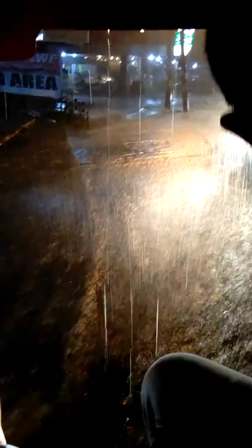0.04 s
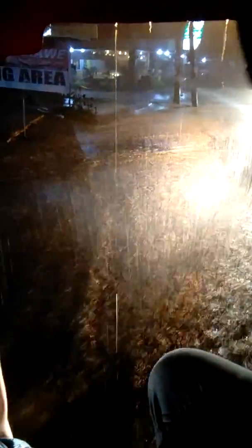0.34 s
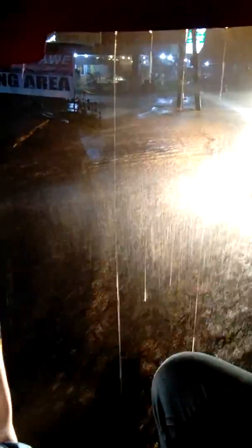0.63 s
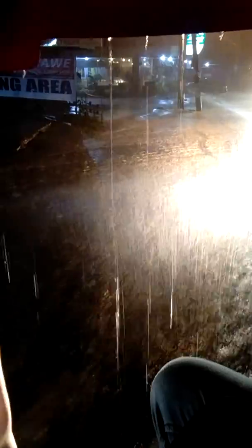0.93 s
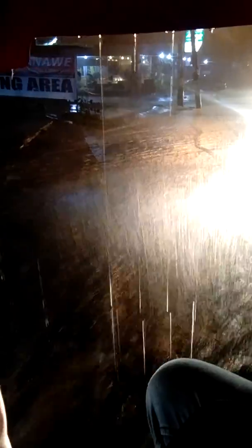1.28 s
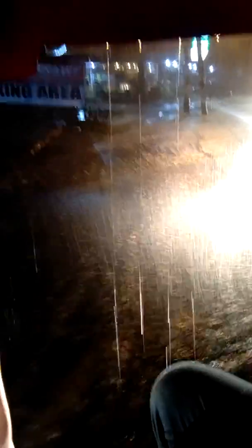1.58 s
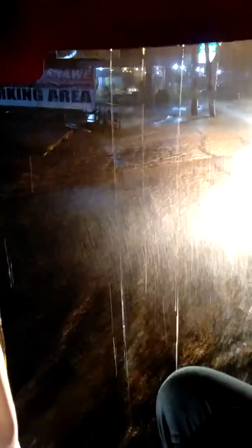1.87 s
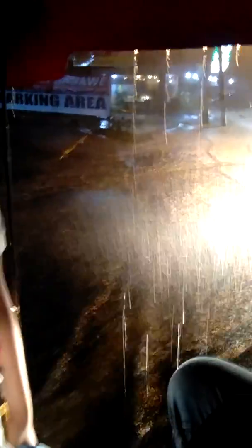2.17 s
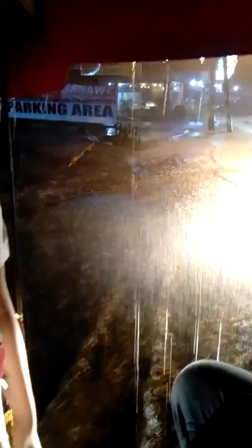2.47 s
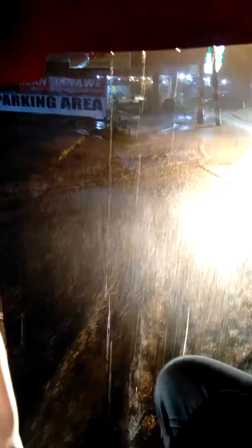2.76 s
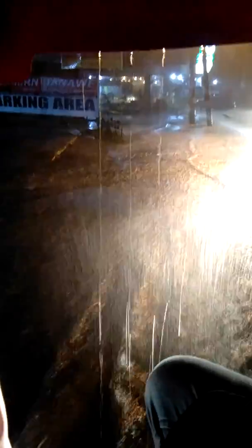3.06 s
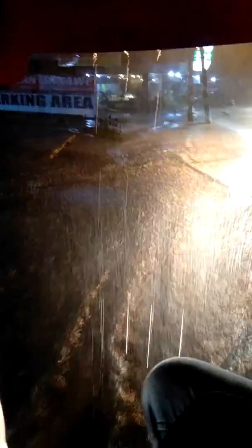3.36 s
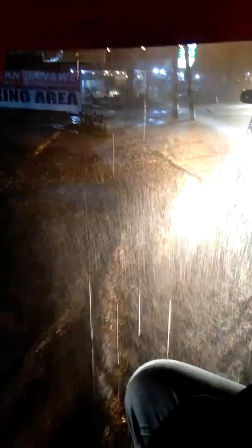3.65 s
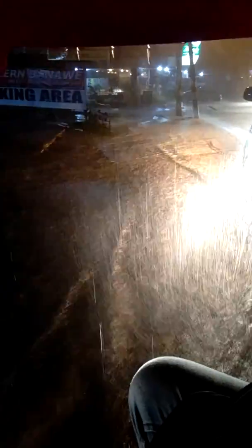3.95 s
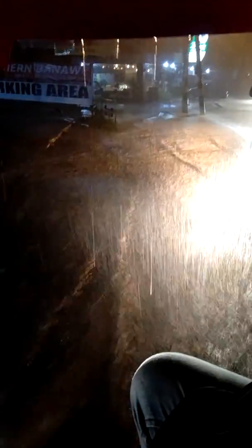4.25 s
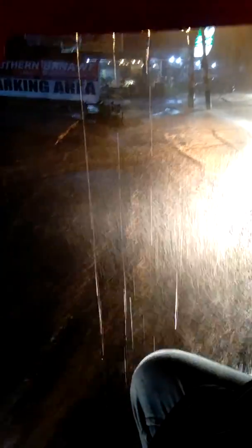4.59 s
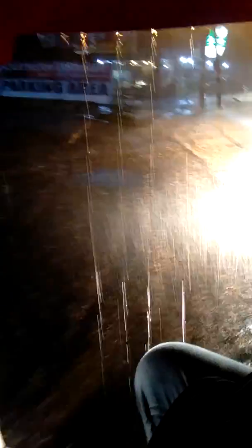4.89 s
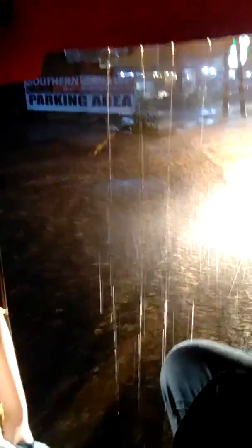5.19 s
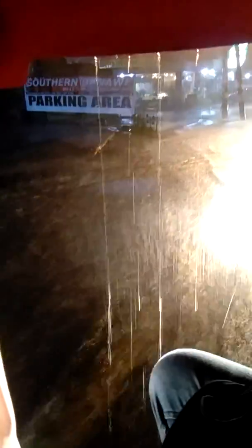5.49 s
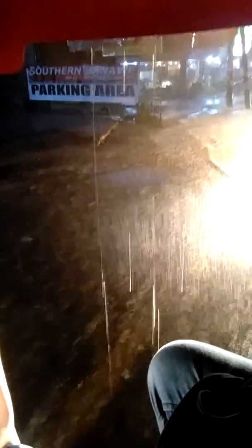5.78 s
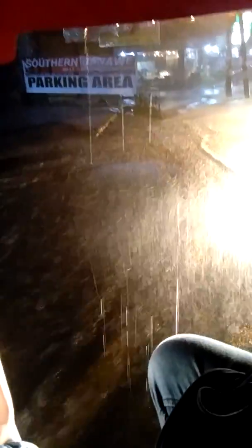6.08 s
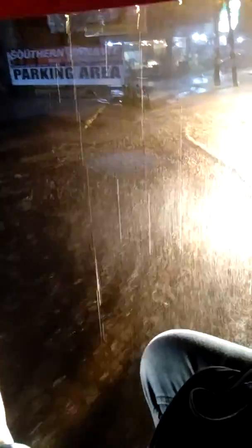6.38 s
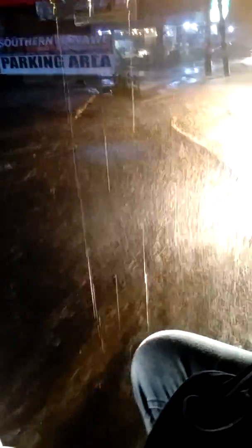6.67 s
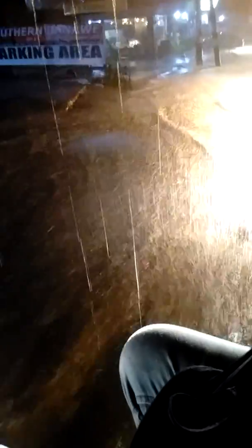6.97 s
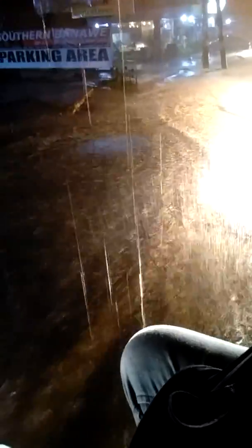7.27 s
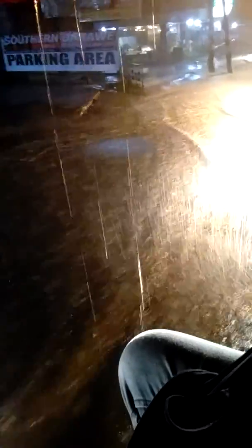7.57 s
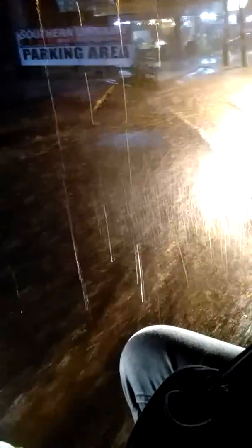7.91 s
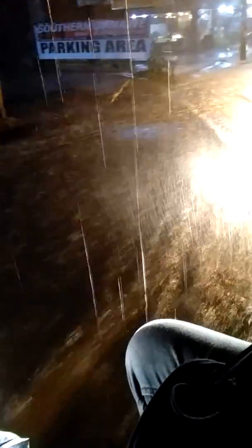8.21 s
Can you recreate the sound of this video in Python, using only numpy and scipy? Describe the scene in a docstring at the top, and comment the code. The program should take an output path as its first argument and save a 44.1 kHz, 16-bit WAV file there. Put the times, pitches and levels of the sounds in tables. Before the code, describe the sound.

From the passenger seat of an open-sided motor tricycle, a small engine drones in repeated bursts of throttle, chugging in between and pulsing against two other engines. The cab booms and rattles, while heavy rain and tyre spray hiss throughout and single drops tick close by. A thin, trembling drive squeal sounds over the first two seconds, again from about 3.5 to 5 seconds, and from 6.7 seconds on. A wheel throws up a puddle around 3.6 seconds, with smaller splashes near 4.2 and 6.8. Between 4.9 and 7 seconds a loose panel clacks about seven times. From about 5.3 seconds the engine alongside speeds up and rasps, and loose metal chatters with it, easing after 7 seconds. From roughly 7.2 to 8 seconds water faintly tinkles on a metal bar. Engines and rain continue to the end, just past 8 seconds.

```python
"""A ride in an open-sided motor tricycle along a flooded street in heavy rain at night.
From the start its small engine drones in bursts and beats against two others in the traffic, while the
drive squeals, the cab booms, rain and tyre spray hiss and drops tick close by. Near the middle a wheel
throws up a puddle. Then a loose panel knocks, and metal chatters as the engine alongside speeds up.
Near the end, water dribbles on a metal bar. All along, a limiter turns the loudest moments down."""
import sys
import numpy as np
from scipy import signal
from scipy.fft import rfft, irfft, next_fast_len
from scipy.io import wavfile
from scipy.ndimage import uniform_filter1d, minimum_filter1d, map_coordinates

SR = 44100
rng = np.random.default_rng(int(sys.argv[2]) if len(sys.argv) > 2 else 0)


def log_audio(samples):
    """Write samples as a 16-bit WAV file to the path given in sys.argv[1]."""
    # one column per channel
    frames = np.atleast_2d(samples).T
    # limit to full scale, then quantise
    limited = np.clip(frames, -1, 1)
    pcm = np.round(limited * 32767).astype(np.int16)
    wavfile.write(sys.argv[1], SR, pcm)


N = 367794

# The notes at which the cab booms. Each row: pitch in Hz, width in Hz, level in dB.
CAB_RINGS = [(48.7, 11, -16), (94.2, 25.4, 1), (133.6, 28, 1), (261.5, 22.2, -11.5), (309.2, 27, -14),
             (466, 94, -30.5)]
# The engine alongside. Each row: time in seconds, firings per second, drone level in dB.
NEIGHBOUR_ENGINE = [(0, 20.2, -21.5), (.2, 21.1, -17.5), (.38, 21.1, -7.5), (.6, 22.3, -20), (1, 23.2, -21),
                    (1.35, 22.2, -20), (1.56, 21.5, -10.5), (1.68, 27.6, -12.5), (2, 26, -14.5),
                    (2.2, 27.9, -15), (2.42, 28.5, -16.5), (2.6, 27.8, -16.5), (2.76, 26.5, -24),
                    (3.05, 25.3, -17.5), (3.3, 23.6, -18.5), (3.5, 19.8, -13.5), (3.7, 20.2, -13.5),
                    (3.9, 22.5, -14), (4.1, 22.2, -12.5), (4.24, 21.4, -11), (4.33, 23.6, -13),
                    (4.6, 24.8, -17.5), (5.05, 24.7, -14), (5.33, 26.6, -15.5), (5.5, 28.7, -15.5),
                    (5.6, 32, -14.5), (5.85, 28.2, -17), (6, 28.6, -13), (6.11, 29, -14.5),
                    (6.26, 29.3, -15), (6.42, 29.5, -16), (6.81, 32, -16), (6.96, 32.5, -15.5),
                    (7.14, 29.6, -17), (7.32, 27, -12.5), (7.5, 25, -17), (7.73, 27.4, -13),
                    (7.9, 29, -16.5), (8.11, 29, -13.5), (8.34, 28.5, -16.5)]
# How strong the watery hiss is. Each row: time in seconds, level in dB.
WETNESS = [(0, -39.5), (.25, -41.5), (1, -38.5), (1.25, -39.5), (1.8, -39.5), (2, -42.5), (2.9, -43),
           (3.45, -41), (3.65, -39.5), (3.8, -41), (4.65, -41), (5.2, -44.5), (5.8, -43), (6.35, -44),
           (6.8, -41.5), (7, -43), (7.45, -41), (7.75, -40.5), (8.34, -40.5)]
# The tone of tyre spray, also used for a panel's rattle. Each row: frequency in Hz, level in dB.
WASH_COLOUR = [(250, -7), (480, -1.5), (700, 2), (820, 2.5), (950, 3.5), (1180, 0.5), (1400, 0), (2000, -2),
               (2900, -7.5), (4000, -17), (5200, -37), (8000, -43)]
# The tone of drops splashing nearby. Each row: frequency in Hz, level in dB.
SPATTER_COLOUR = [(2000, -16), (4400, 3), (7000, -4.5), (8800, 3), (9700, 6.5), (11000, -9), (12500, -18),
                  (15400, -26)]


def amp(db):
    """Turn decibels into a number to multiply by."""
    return 10 ** (np.asarray(db) / 20)


def unit(x):
    """Scale a signal so that its average strength (rms) is 1."""
    return x / np.sqrt(np.mean(x ** 2) + 1e-20)


def curves(rows):
    """Join a table's points with lines: one curve for each column after the time."""
    times, *columns = np.transpose(rows)
    return [np.interp(np.arange(N) / SR, times, column) for column in columns]


def wobble(per_second):
    """A smooth curve through this many random points a second."""
    points = rng.standard_normal(int(N * per_second / SR) + 4)
    coarse = np.arange(0, N + 16, 16)
    return np.interp(np.arange(N), coarse, map_coordinates(points, [coarse * per_second / SR]))


def filtered(x, response):
    """Multiply each frequency in x by response(hz)."""
    size = next_fast_len(N + SR // 2)
    return irfft(rfft(x, size) * response(np.fft.rfftfreq(size, 1 / SR)), size)[:N]


def coloured(x, colour):
    """Give x the tone set by rows of frequency and level, at strength 1."""
    freqs, db = np.transpose(colour)
    return unit(filtered(x, lambda hz: amp(np.interp(np.log(hz + 1), np.log(freqs), db, right=-120))))


def resonate(x, rings):
    """Pass x through a body that rings at certain pitches."""
    return filtered(x, lambda f: sum((-1) ** k * amp(db) * 1j * f * width / (hz**2 - f**2 + 1j * f * width)
                                     for k, (hz, width, db) in enumerate(rings)))


def noise():
    """Fresh white noise."""
    return rng.standard_normal(N)


def cycles(hz):
    """Count the cycles completed at a changing rate."""
    return np.cumsum(hz) / SR


def throttle(idle_rate=22, ramp_s=0.12, thump_muting=0.85):
    """Each burst of throttle lifts the firings per second, brings in the drone and softens the thumps."""
    # Each row: start, peak and end in seconds, top firings per second, drone and undertone in dB.
    bursts = [(-.4, 0, .3, 24.4, -15, -32), (0.42, 0.992, 1.52, 25.8, -13, -23),
              (1.498, 2.022, 2.17, 25.2, -15.5, -29), (2.502, 2.75, 3.04, 25.1, -15, -38),
              (3.281, 3.721, 3.88, 24.7, -17, -31), (4.203, 4.621, 4.88, 24.4, -14.5, -26),
              (6.559, 6.802, 7.15, 24.4, -13.5, -34), (7.05, 7.82, 7.85, 26.3, -14, -23),
              (8.051, 8.45, 8.7, 24.3, -15, -37)]
    t = np.arange(N) / SR
    rate, drone_gain, undertone_gain, load = idle_rate, 0, 0, 0
    for start, peak, end, top_rate, drone_db, undertone_db in bursts:
        arch = np.sin(np.pi / 2 * np.interp(t, [start, peak, end], [0, 1, 0])) ** 1.4
        pull = np.clip(np.minimum(t - start, end - t) / ramp_s, 0, 1)
        rate = rate + (top_rate - idle_rate) * arch
        drone_gain = np.maximum(drone_gain, amp(drone_db) * pull)
        undertone_gain = undertone_gain + amp(undertone_db) * arch
        load = np.maximum(load, pull)
    return rate, drone_gain, undertone_gain, 1 - thump_muting * load


def exhaust(rate, harmonics, smear, uneven_db=0.7, flutter_db=0.5):
    """Tones at multiples of the firing rate add up to uneven thumps; smear puts them a bit out of step."""
    turns = cycles(rate)
    sizes_db = uneven_db * rng.standard_normal(400)
    tones = 0
    for multiple, db in harmonics:
        gain = amp(db + flutter_db * wobble(14))
        tones += gain * np.cos(2 * np.pi * multiple * turns + smear * rng.standard_normal())
    return -amp(np.interp(turns, np.arange(len(sizes_db)), sizes_db)) * tones


def firings(rate, scatter_db):
    """One push per firing, each of its own size."""
    fired = np.diff(np.floor(cycles(rate) + rng.random()), prepend=0) > 0
    return fired * amp(scatter_db * noise())


def tricycle(rate, drone_gain, undertone_gain, thump_gain):
    """When pulling, the engine drones over a deep undertone; when coasting, it chugs in separate thumps."""
    # The tones of the drone and the undertone. Each row: multiple of the firing rate, level in dB.
    drone_tones = [(4, 3.5), (5, -6), (6, -14), (7, -18), (8, -20)]
    deep_tones = [(2, -2.7), (3, 1)]
    drone = drone_gain * exhaust(rate, drone_tones, smear=0.48)
    undertone = undertone_gain * exhaust(rate, deep_tones, smear=0.28)
    pushes = firings(rate * (1 + 0.03 * wobble(6)), scatter_db=2.2)
    thumps = unit(resonate(thump_gain * pushes, CAB_RINGS))
    return drone + undertone + amp(-22.5) * thumps


def traffic():
    """Two more engines drone; the nearer one rasps as its higher tones sweep through the cab's notes."""
    # The engine farther off. Each row: time in seconds, firings per second, level in dB.
    far_engine = [(0, 23.2, -26), (.65, 22.2, -22), (.9, 18.6, -42), (1.4, 20.2, -24), (1.74, 22.8, -20.5),
                  (2.15, 22.5, -23), (2.75, 22.3, -24), (3.15, 21.1, -32), (3.65, 20.5, -21),
                  (4.3, 20.9, -25), (4.9, 20.8, -30), (5.5, 21.7, -24), (6.5, 20.8, -26), (8.34, 21.2, -29)]
    # The near engine's rasp, strongest as it speeds up. Each row: time in seconds, level in dB.
    rasp_levels = [(0, -29), (1.5, -31), (2, -33.5), (2.45, -29), (2.8, -38), (3.2, -36), (3.6, -36.5),
                   (4.4, -31), (5, -39), (5.4, -26), (5.9, -26.5), (6.3, -26), (6.7, -21), (7, -25),
                   (7.3, -29.5), (8.34, -30.5)]
    # The tones of the exhausts. Each row: multiple of the firing rate, level in dB.
    near_tones = [(3, -21), (4, -3), (5, 3.3), (6, -9.5), (7, -22)]
    far_tones = [(6, 1.5), (7, -5), (8, 0.5), (12, -15.5), (14, -14.5), (15, -15.5)]
    rasp_tones = [(8, -7), (9, 1.5), (10, -3.5), (11, -2.5), (12, -10), (15, -0.5), (16, 4.5), (17, -1.5)]
    # How well the near drone carries into the cab. Each row: frequency in Hz, gain in dB.
    carry = [(60, -17), (85, -7.5), (105, -0.5), (130, 0), (165, -2.5), (200, 1.5)]
    near_rate, near_db = curves(NEIGHBOUR_ENGINE)
    far_rate, far_db = curves(far_engine)
    rasp_db, = curves(rasp_levels)
    near = amp(near_db) * exhaust(near_rate, near_tones, smear=0.28)
    near = filtered(near, lambda hz: amp(np.interp(hz, *np.transpose(carry))))
    far = amp(far_db) * exhaust(far_rate, far_tones, smear=0.4)
    rasp_gain = amp(rasp_db + 1.42 * wobble(45))
    rasp = exhaust(near_rate * (1 + 0.02 * wobble(22)), rasp_tones, smear=0.36, uneven_db=1.0)
    return near + far + rasp_gain * unit(resonate(rasp, CAB_RINGS))


def strand(hz, wander_hz=14, flutter_db=2.5):
    """One unbroken squealing tone whose pitch and level tremble."""
    gain = amp(flutter_db * wobble(60))
    return unit(gain * np.cos(2 * np.pi * cycles(hz + wander_hz * wobble(90))))


def whine(hz, width_hz):
    """A fuzzy tone: a narrow band of noise around one pitch."""
    angle = 2 * np.pi * cycles(hz)
    return unit(wobble(width_hz) * np.cos(angle) + wobble(width_hz) * np.sin(angle))


def ringing(rings):
    """Metal that keeps ringing at several fuzzy pitches."""
    return sum(amp(db) * whine(np.full(N, hz), width) for hz, width, db in rings)


def jolts(rate, decay):
    """A repeating shake that fades until the next one comes."""
    return unit(np.exp(-decay * (cycles(rate) % 1)))


def drive_squeal(rate):
    """The drive squeals under load, shaken by each firing, and nearby metal rings along."""
    # The squeal's path. Each row: time in seconds, centre pitch in Hz, level in dB.
    squeal_path = [(0, 1973, -36), (.28, 1733, -38), (.38, 1722, -49), (.52, 1810, -34), (.8, 1944, -36),
                   (1, 1990, -40), (1.25, 1923, -35), (1.47, 1840, -40), (1.85, 1867, -40), (2, 1713, -60),
                   (3.4, 1730, -62), (3.57, 1818, -37), (3.72, 2002, -39), (3.84, 1875, -39.5),
                   (3.98, 1798, -42), (4.3, 1873, -37), (4.6, 1918, -37), (4.8, 1877, -36),
                   (4.88, 1671, -38), (4.96, 1624, -63), (6.6, 1700, -64), (6.73, 1867, -38),
                   (7.1, 1787, -39), (7.35, 1871, -42), (7.7, 1856, -45), (7.95, 1896, -40),
                   (8.17, 1813, -40), (8.34, 1945, -35)]
    # A higher tone above it. Each row: time in seconds, level against the squeal in dB.
    overtone_levels = [(0, -6), (1.1, -12), (1.7, -10), (4.5, -19), (6.8, -8), (8.34, -8)]
    # The nearby metal. Each row: pitch in Hz, width in Hz, level in dB.
    metal_rings = [(1274, 110, -7.5), (3043, 160, -12.5)]
    hz, squeal_db = curves(squeal_path)
    overtone_db, = curves(overtone_levels)
    strands = unit(strand(hz - 2 * rate)
                   + amp(0.5) * strand(hz + 2 * rate)
                   + amp(-10) * strand(hz - 12 * rate))
    overtone = amp(overtone_db) * whine(1.53 * hz, width_hz=130)
    return amp(squeal_db) * jolts(rate, decay=1.0) * (strands + overtone + ringing(metal_rings))


def patter(per_second, scatter_db):
    """Tiny hits at random moments, most small, a few large."""
    hits = rng.random(N) < per_second / SR
    return unit(hits * amp(scatter_db * np.clip(noise(), -3, 2.5)) * np.sign(noise()))


def road(rate):
    """The wet road shakes the cab, the bodywork rattles with the engine and the tyres throw water."""
    # How rough the ride is. Each row: time in seconds, rumble in dB, rattle in dB.
    roughness = [(0, -15, -28), (.4, -23, -29.5), (1, -19.5, -27), (1.7, -15.5, -28.5), (2.4, -22.5, -26.5),
                 (2.8, -22, -29.5), (3.2, -18.5, -28.5), (3.7, -17.5, -27), (4.2, -23, -29.5),
                 (5.3, -22, -30.5), (6, -23.5, -30), (6.8, -18.5, -29), (7.2, -20.5, -30), (7.65, -15, -30),
                 (8.34, -21, -27.5)]
    # The tone of the rumble and of the rattle. Each row: frequency in Hz, level in dB.
    rumble_colour = [(15, -34), (35, -17), (55, -15.5), (75, -5.5), (100, -5.5), (125, -2), (190, -13),
                     (260, -21.5), (500, -66)]
    rattle_colour = [(120, -34), (200, -8), (310, 1.5), (400, -7.5), (530, -7), (700, -18.5), (1500, -54)]
    rumble_db, rattle_db = curves(roughness)
    wet_db, = curves(WETNESS)
    throb = np.cos(2 * np.pi * cycles(rate))
    rumble = amp(rumble_db) * coloured(noise(), rumble_colour)
    rattle = amp(rattle_db + 1.45 * wobble(8.8) + 0.99 * throb) * coloured(noise(), rattle_colour)
    water = noise() + 0.75 * patter(per_second=1500, scatter_db=3.5)
    wash_db = -29.5 + 0.59 * (wet_db - wet_db.mean())  # partly follows the rain's hiss
    wash = amp(wash_db + 0.6 * wobble(24) + 0.29 * throb) * coloured(water, WASH_COLOUR)
    return rumble + rattle + wash


def rain():
    """Countless far drops merge into a hiss; nearer ones patter and sizzle on the road."""
    # The tone of the hiss. Each row: frequency in Hz, level in dB.
    hiss_colour = [(1500, -17), (3200, 6.5), (4900, 2.5), (5900, -3.5), (7200, -4), (8400, -1), (9600, 2),
                   (10700, -5), (12500, -12), (15400, -18)]
    wet_db, = curves(WETNESS)
    drops = 0.5 * patter(per_second=1400, scatter_db=1.5)
    splashes = noise() * amp(0.72 * wobble(350))
    hiss = amp(0.77 * wobble(34)) * coloured(splashes + drops, hiss_colour)
    # drops beside the cab come in bursts of a few milliseconds
    sizzle = noise() * amp(6.35 * np.clip(wobble(260), -3, 2.4) + 1.1 * wobble(30))
    return amp(wet_db) * (hiss + amp(-10.5) * coloured(sizzle, SPATTER_COLOUR))


def spatters(drops, colour, fade_s, rise_s=0.0025):
    """Each drop spreads into a puff of bright noise that falls 60 dB in fade_s seconds."""
    t = np.arange(SR // 12) / SR
    puffs = np.zeros(N)
    for start, db in drops:
        puffs[round(start * SR):][:len(t)] += amp(db - 60 * t / fade_s) * (1 - np.exp(-t / rise_s))
    return puffs * coloured(noise(), colour)


def drips():
    """Fine spray ticks and bigger drops spatter close by."""
    # When the spray and the drops land. Each row: start in seconds, relative level in dB.
    spray_hits = [(0.5024, -36), (1.39, -38), (3.1773, -47), (4.1104, -37), (4.149, -33), (4.605, -34),
                  (4.6666, -30), (4.7489, -33), (5.6737, -37), (5.8802, -37), (7.2543, -33)]
    drop_hits = [(0.586, -29), (0.7506, -33), (1.5516, -32), (2.0673, -34), (2.57, -34), (2.9716, -33),
                 (4.6655, -32), (4.748, -30), (5.6173, -38), (5.673, -33), (5.8813, -35), (7.452, -33)]
    # The bright tone of a tick. Each row: frequency in Hz, level in dB.
    tick_colour = [(4000, -18), (8000, -7), (9700, 2), (12000, -4), (15400, -14)]
    drops = amp(-2.5) * spatters(drop_hits, SPATTER_COLOUR, fade_s=0.08)
    ticks = amp(-3) * spatters(spray_hits, tick_colour, fade_s=0.055)
    return drops + ticks


def puddles():
    """A wheel throws up sheets of water that swell and fall back as grainy spray."""
    # The splashes. Each row: peak time in seconds, half length in seconds, level in dB.
    splashes = [(3.64, .13, -41), (4.19, 0.018, -45), (6.764, .025, -38), (6.815, 0.026, -46),
                (6.87, 0.051, -42)]
    # Their tone. Each row: frequency in Hz, level in dB.
    splash_colour = [(1000, -12), (3000, 4), (4800, 5), (6500, -4), (7600, -8), (9700, 2), (11500, -14),
                     (15400, -21)]
    t = np.arange(N) / SR
    swell = sum(amp(db) * np.exp(-((t - peak) / half) ** 2) for peak, half, db in splashes)
    return swell * coloured(noise() * amp(6.5 * wobble(300)), splash_colour)


def knocks(rattle_fade_s=0.047):
    """Bumps make a loose panel clack: a dull rattle plus its own notes, in a new mix each time."""
    # The bumps. Each row: start in seconds, relative level in dB.
    bumps = [(4.904, -22), (5.308, -19), (5.349, -22), (6.241, -21), (6.408, -19.5), (6.76, -18),
             (7.012, -21.5)]
    # The panel's notes. Each row: pitch in Hz, level in dB, seconds to fade by 60 dB.
    panel_notes = [(744, 6, .03), (1260, 10.5, 0.016), (1400, -7, 0.037), (1830, -8, 0.033),
                   (2420, -3, .04), (2900, -6, .025)]
    t = np.arange(SR // 12) / SR
    rings, rattle_gain = np.zeros(N), np.zeros(N)
    for start, db in bumps:
        ring = sum(amp(level + rng.normal(0, 1.7) - 60 * t / fade_s) * np.sin(2 * np.pi * hz * t)
                   for hz, level, fade_s in panel_notes)
        rings[round(start * SR):][:len(t)] += amp(db) * ring
        rattle_gain[round(start * SR):][:len(t)] += amp(db - 60 * t / rattle_fade_s)
    return amp(-10.5) * rings + amp(-4.5) * rattle_gain * coloured(noise(), WASH_COLOUR)


def chatter():
    """Loose metal rings low and high, shaken twice per firing of the engine alongside."""
    # How strongly it rings. Each row: time in seconds, low rings in dB, high ring in dB.
    levels = [(4.9, -70, -74), (5.25, -51, -44), (5.65, -41, -43), (6, -39, -41.5), (6.3, -40, -42),
              (6.45, -36, -37), (6.57, -41, -46), (6.7, -37, -38), (6.85, -42, -52), (7, -40, -64),
              (7.35, -47, -59), (7.55, -51, -54), (8.34, -43, -63)]
    # The metal's notes. Each row: pitch in Hz, width in Hz, level in dB.
    low_rings = [(1085, 70, -5), (1283, 140, 1.5)]
    high_ring = [(2513, 280, 0)]
    low_db, high_db = curves(levels)
    rate, _ = curves(NEIGHBOUR_ENGINE)
    shaking = unit(jolts(rate, decay=0.76) * jolts(2 * rate, decay=1.4)) * amp(0.78 * wobble(30))
    return shaking * (amp(low_db) * ringing(low_rings) + amp(high_db) * ringing(high_ring))


def dribble():
    """A thin stream of drops tinkles on a metal bar."""
    # How strong the stream is. Each row: time in seconds, level in dB.
    flow = [(7.05, -75), (7.2, -54), (7.5, -49), (7.7, -51), (7.83, -48.5), (8, -57), (8.34, -64)]
    # The bar's notes. Each row: pitch in Hz, width in Hz, level in dB.
    bar_rings = [(3980, 70, 0), (4460, 110, -1), (4960, 70, -3), (5920, 60, -4), (6350, 100, -6),
                 (9500, 600, -6), (10200, 200, -7)]
    flow_db, = curves(flow)
    return amp(flow_db) * unit(resonate(patter(per_second=240, scatter_db=2.0), bar_rings))


def scene():
    """Everything as heard from the passenger seat, in one channel."""
    rate, drone_gain, undertone_gain, thump_gain = throttle()
    machines = tricycle(rate, drone_gain, undertone_gain, thump_gain) + traffic() + drive_squeal(rate)
    return (machines + road(rate) + rain() + drips() + puddles() + knocks() + chatter() + dribble())[None]


def record(dry, ceiling=0.59, hold_s=0.014, ease_s=0.0082, top_hz=15500):
    """A fast limiter turns everything down on the drone's peaks; then the highest treble is cut off."""
    x = dry[0]
    level = np.abs(uniform_filter1d(x, SR // 800))  # smoothing lets very brief peaks slip through
    needed_gain = np.minimum(1, ceiling / (level + 1e-9))
    held_gain = minimum_filter1d(needed_gain, int(hold_s * SR) + 1)
    gain = uniform_filter1d(held_gain, int(ease_s * SR) + 1)
    soft_ends = signal.windows.tukey(N, 0.001)
    return filtered(x * gain * soft_ends, lambda hz: hz < top_hz)[None]


dry = scene()
out = record(dry)
log_audio(out)
```